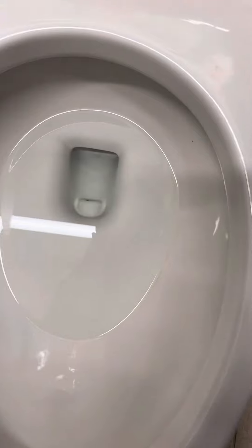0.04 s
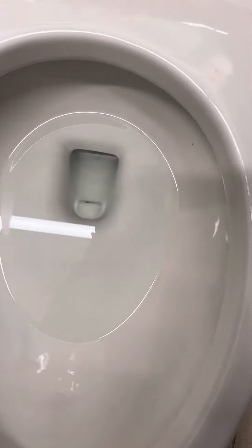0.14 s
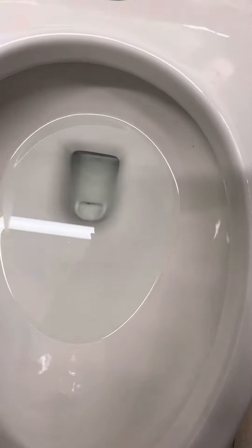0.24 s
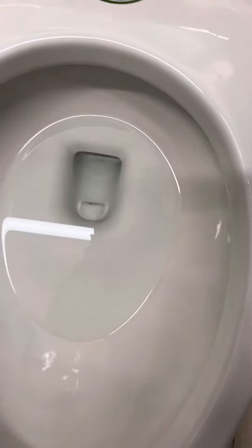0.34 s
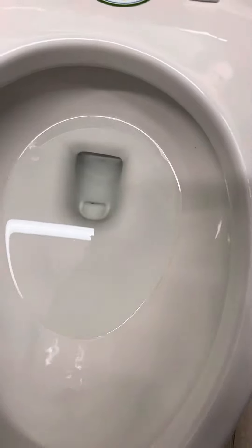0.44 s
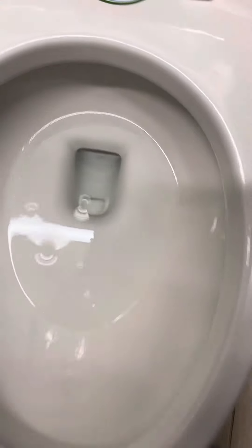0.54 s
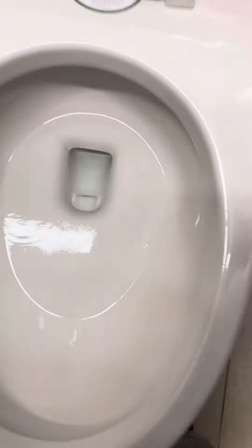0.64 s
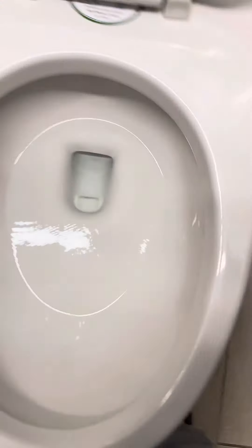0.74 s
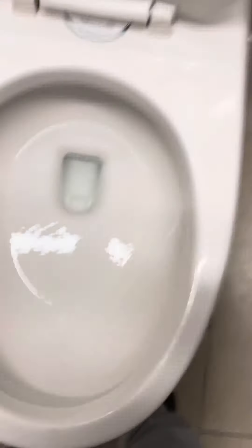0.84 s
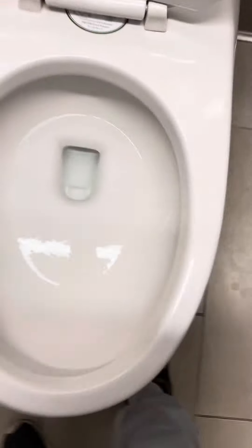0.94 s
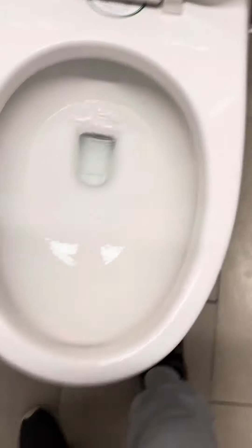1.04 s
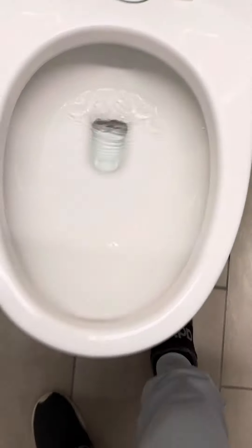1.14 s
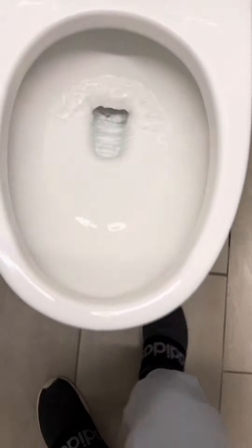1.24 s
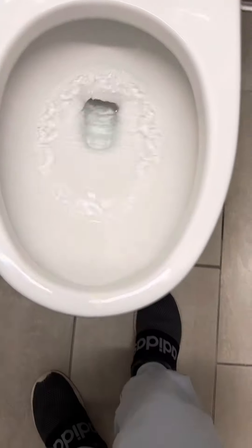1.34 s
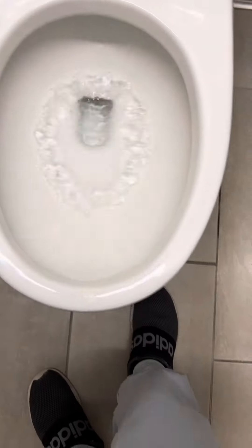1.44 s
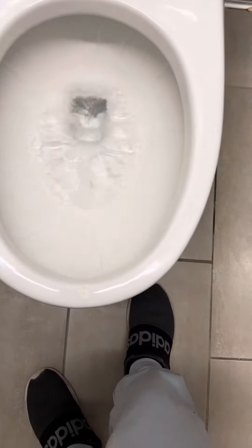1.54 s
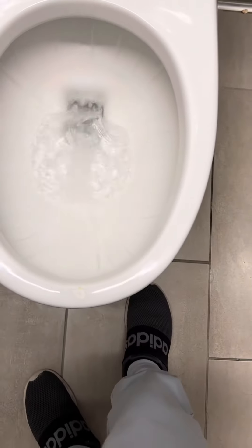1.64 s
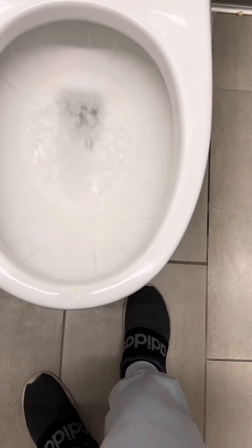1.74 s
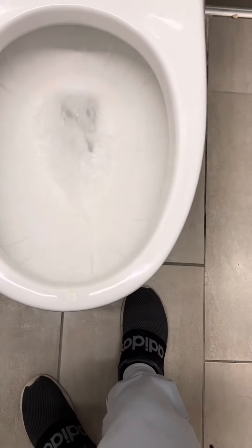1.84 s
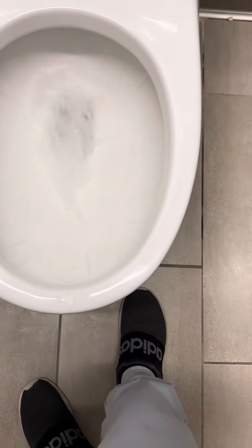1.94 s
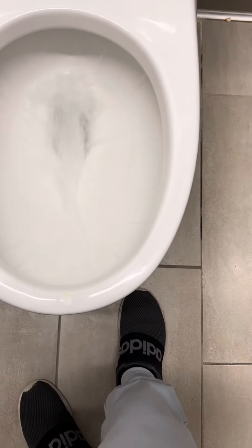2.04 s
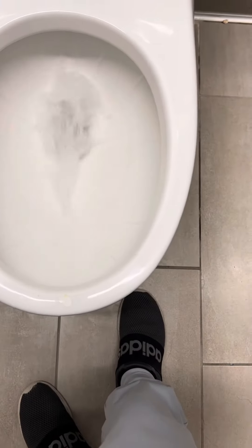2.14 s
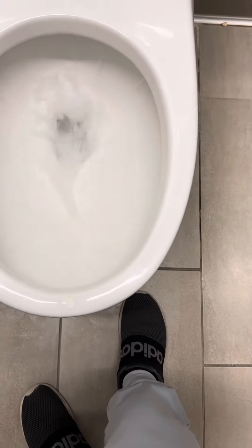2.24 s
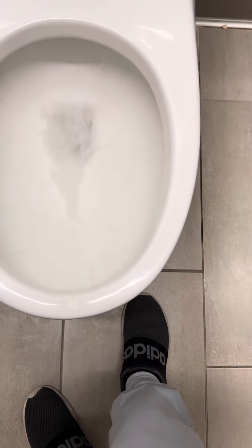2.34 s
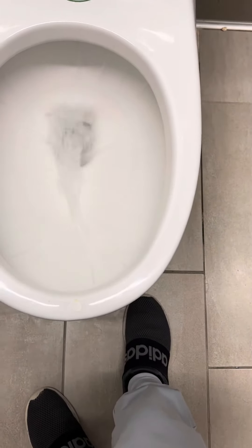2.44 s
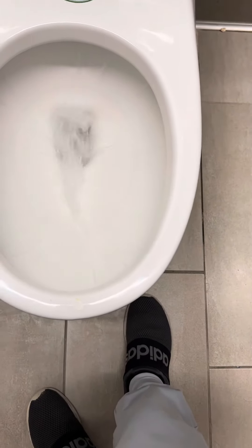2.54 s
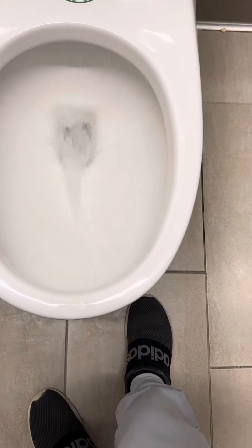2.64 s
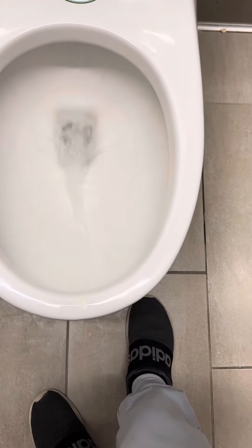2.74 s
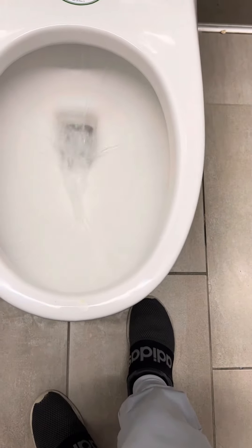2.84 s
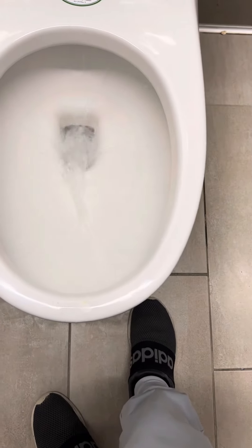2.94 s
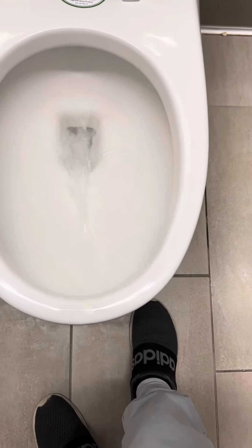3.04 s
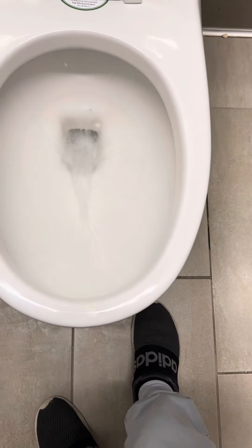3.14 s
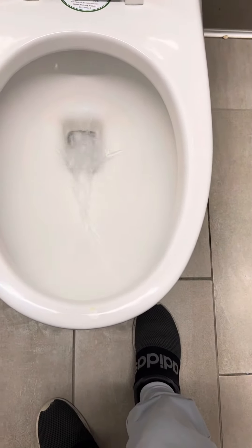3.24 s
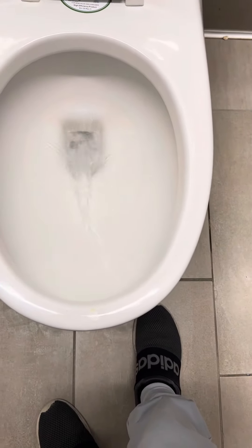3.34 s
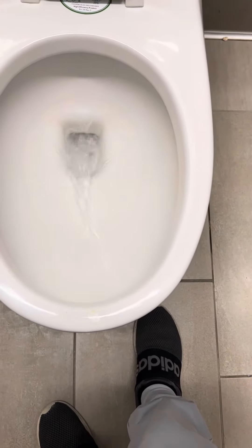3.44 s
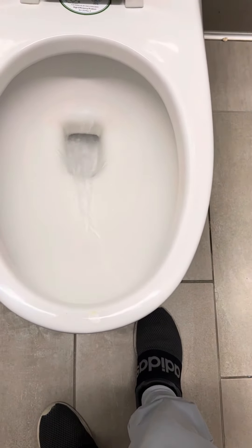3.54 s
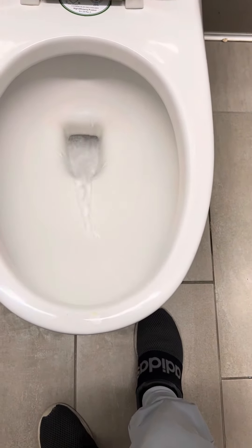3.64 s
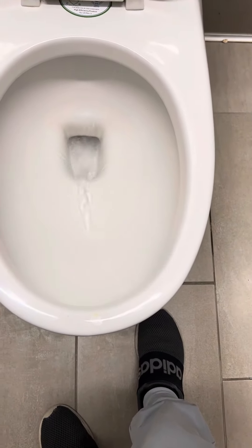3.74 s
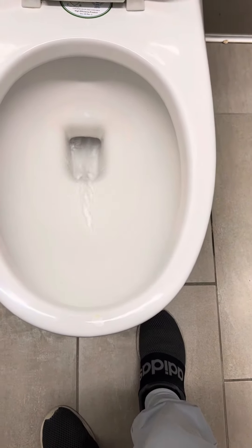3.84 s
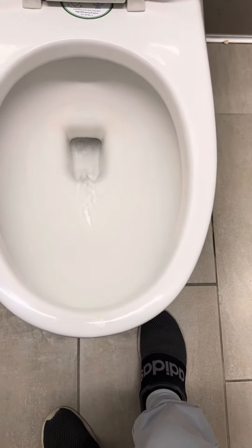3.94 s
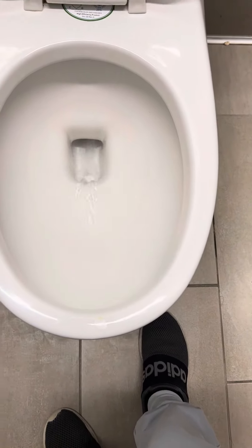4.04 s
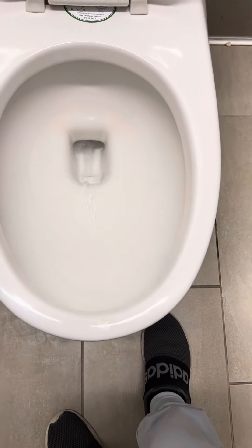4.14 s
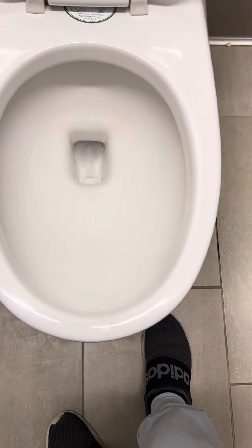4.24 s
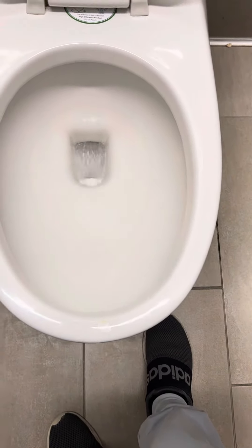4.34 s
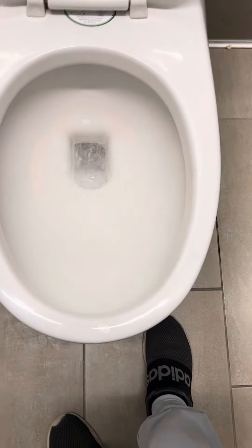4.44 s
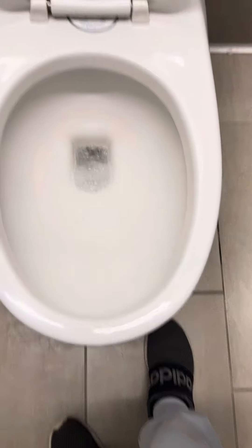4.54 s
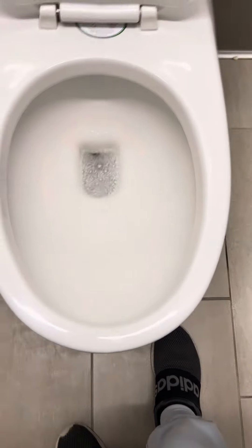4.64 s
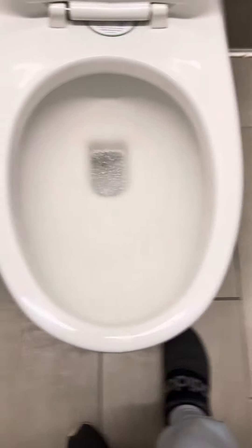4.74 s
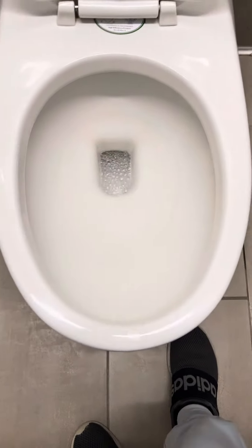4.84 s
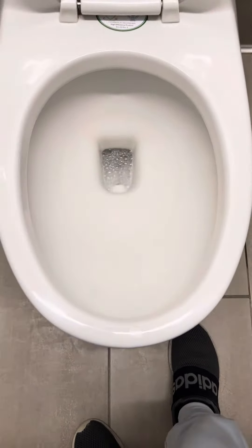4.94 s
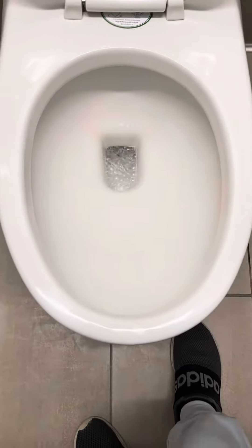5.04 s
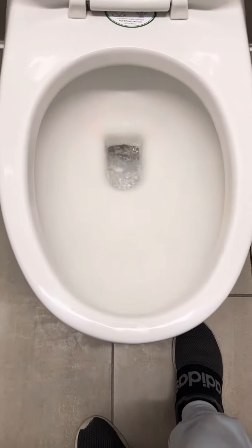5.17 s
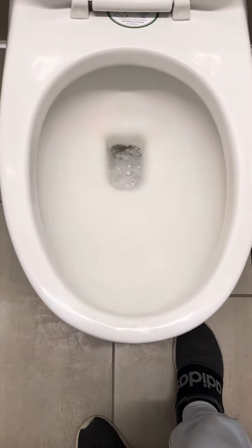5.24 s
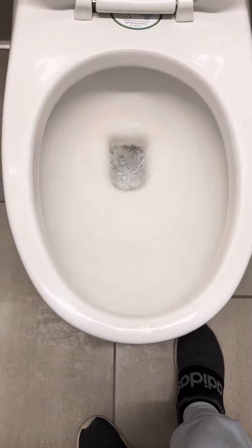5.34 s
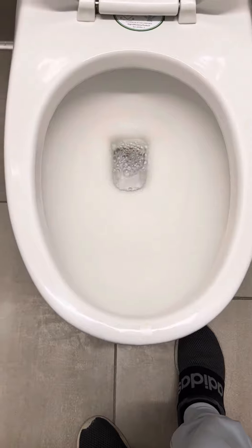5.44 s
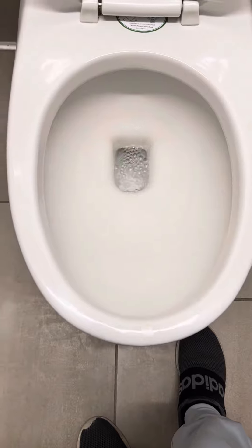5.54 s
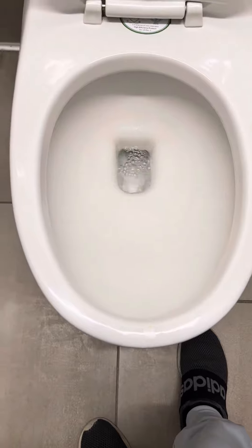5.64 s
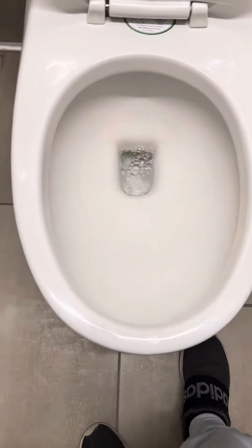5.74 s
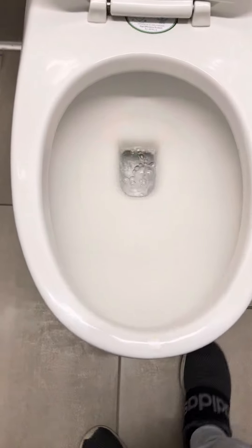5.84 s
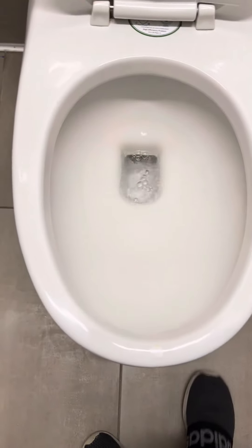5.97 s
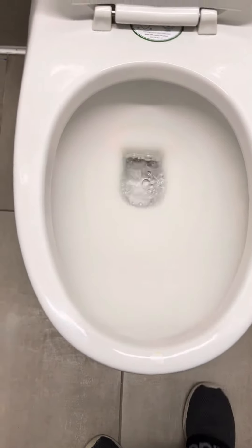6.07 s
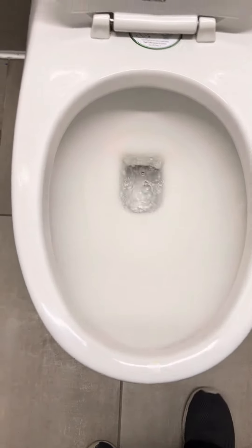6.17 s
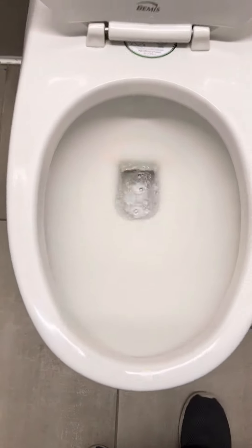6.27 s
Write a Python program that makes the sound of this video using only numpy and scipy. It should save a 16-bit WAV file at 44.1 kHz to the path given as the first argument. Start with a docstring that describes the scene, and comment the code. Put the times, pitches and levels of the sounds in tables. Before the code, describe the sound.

A pressure toilet flushes in a small tiled bathroom, heard from above in stereo. The valve hisses and knocks open, and the pipes thud and rumble. Water suddenly sprays onto the porcelain, then the drain gulps and gurgles loudly while sucked air whistles and sizzles. The flow fades, the valve closes with a faint hiss and hum, and a few drips and ticks remain.

```python
"""A pressure toilet flushes in a small tiled bathroom, heard from above in stereo.
The valve hisses and knocks open, and water hammer thuds along the rumbling pipes. The jets spurt and
spray onto the porcelain; then the trap gulps ringing air bubbles while air drawn through the jet
whistles and sizzles. The flow dies away, the valve seats with a hiss and a low hum, and a few late
drops and ticks remain."""
import sys
import numpy as np
from scipy import signal
from scipy.fft import rfft, irfft, next_fast_len
from scipy.io import wavfile
from scipy.ndimage import uniform_filter1d, minimum_filter1d

SR = 44100
rng = np.random.default_rng(int(sys.argv[2]) if len(sys.argv) > 2 else 0)


def waveform_to_disk(signal):
    """Save audio, clipped to [-1, 1], as 16-bit WAV at the path in sys.argv[1]."""
    frames = np.transpose(np.atleast_2d(signal))
    scaled = np.clip(frames, -1, 1) * 32767
    samples = np.round(scaled).astype(np.int16)
    wavfile.write(sys.argv[1], SR, samples)


N = 278196


def gain_of(db):
    """Amplitude ratio of a level in decibels."""
    return 10 ** (np.asarray(db) / 20)


def unit_rms(x):
    """Normalisation to unit mean power."""
    return x / np.sqrt(np.mean(x ** 2) + 1e-20)


def spectrum(points):
    """A function of frequency, interpolated between points on a logarithmic axis."""
    f, value = np.transpose(points)
    return lambda hz: np.interp(np.log(hz + 1), np.log(f + 1), value)


def resonances(rows):
    """A spectrum in dB whose resonance peaks add in power."""
    return lambda hz: 10 * np.log10(sum(
        gain_of(db) ** 2 / (1 + (2 * (hz - f) / width) ** 2) ** 1.25 for f, width, db in rows))


def envelopes(rows):
    """Piecewise linear envelopes, one for each column after the time."""
    times, *columns = np.transpose(rows)
    return [np.interp(np.arange(N) / SR, times, column) for column in columns]


def swells(rows):
    """Exponential growth to each peak and exponential decay after it."""
    t = np.arange(N) / SR
    return sum(gain_of(db - np.maximum(rise * (s - t), fall * (t - s))) for s, db, rise, fall in rows)


def add(mix, start_s, sound):
    """Superposition of a sound on the mix."""
    part = mix[round(start_s * SR):][:len(sound)]
    part += sound[:len(part)]


def noises(spectra, patchy_db, flicker_db, size):
    """Modulated noise: one uncorrelated pair, with drifting patches and flicker, in each spectrum."""
    frames, bins = 4 * N // size + 5, size // 2 + 1
    a, b, c, d, patches = rng.standard_normal((frames, bins, 5)).T
    patches = unit_rms(uniform_filter1d(uniform_filter1d(patches, size=7, axis=0), size=9, axis=1))
    flicker = unit_rms(uniform_filter1d(rng.exponential(1, frames) - 1, size=3))
    z = np.array([a + 1j * b, c + 1j * d]) * gain_of(patchy_db * patches + flicker_db * flicker)
    hz = np.fft.rfftfreq(size, 1 / SR)
    shaped = (z * gain_of(shape_db(hz))[:, None] for shape_db in spectra)
    return [unit_rms(signal.istft(x, nperseg=size, noverlap=3 * size // 4)[1][:, :N]) for x in shaped]


def bubble(hz, cycles, rise, swell_cycles=0.31):
    """A damped oscillator, such as an air pocket; its pitch glides by the share `rise` in `cycles`."""
    u = np.arange(0, 2 * cycles, hz / SR)
    envelope = np.minimum(u / swell_cycles, 1) * np.exp(-0.87 * (u / cycles) ** 2)
    return envelope * np.sin(2 * np.pi * u * (1 + rise * u / cycles / 2))


def swarm(lo_hz, hi_hz, per_s, cycles, rise, spread_db, pitches):
    """A Poisson process of ringing bubbles: the louder, the rarer."""
    out = np.zeros((2, N))
    for hz in np.geomspace(lo_hz, hi_hz, pitches):
        luck = rng.random((2, N), dtype=np.float32) / (per_s / pitches / SR)
        born, train = luck < 1, np.zeros((2, N))
        train[born] = gain_of(-spread_db * np.log(np.maximum(luck[born], np.exp(-4))))
        ring = bubble(hz, cycles, rise * rng.uniform(-0.77, 1))
        out += signal.oaconvolve(train, ring[None], axes=1)[:, :N]
    return out


def room_noise():
    """The ambient noise floor, with most of its power at low frequencies."""
    # Each row: frequency in Hz, spectral density in dB.
    density = [(30, -10.5), (48, 5.5), (100, -9), (200, 5.5), (350, -12), (600, -18), (1500, -30),
               (4000, -39.5), (9000, -49), (16000, -64)]
    return gain_of(-60) * noises([spectrum(density)], patchy_db=1.8, flicker_db=1.2, size=1024)[0]


def tile_reverb(x):
    """Reverberation: reflections off the tiles form two diffuse tails, each band with its own decay."""
    # Each row: frequency in Hz, time to fall 60 dB in seconds.
    t60 = spectrum([(100, 0.27), (1000, 0.3), (5000, 0.3), (15000, 0.18)])
    hz, t, z = signal.stft(rng.standard_normal((2, SR // 2)), SR, nperseg=256)
    tail = signal.istft(z * gain_of(-60 * t / t60(hz)[:, None]), SR, nperseg=256)[1]
    return signal.fftconvolve(x[None], tail / np.linalg.norm(tail[0]), axes=1)[:, :N]


def in_bowl(x):
    """Cavity resonance: the bowl favours two bands and, being minimum phase, rings only after a blow."""
    # Each row: frequency in Hz, gain in dB.
    response = [(150, -42.5), (300, -23.5), (500, -14), (620, -2), (800, 0), (900, 0), (990, -5),
                (1150, -1), (1350, -1), (1600, 1), (1780, -8), (2050, -2), (2400, -10.5), (5000, -35),
                (9000, -71.5)]
    hz = abs(np.fft.fftfreq(4096, 1 / SR))
    log_gain = np.log(gain_of(spectrum(response)(hz)))
    taps = np.fft.ifft(np.exp(np.conj(signal.hilbert(log_gain)))).real[:2048]
    return signal.oaconvolve(np.atleast_2d(x), taps[None], axes=1)[:, :N]


def plumbing():
    """Forced vibration: shaken as the valve opens and shuts, the pipes rumble and the bowl drones."""
    # Each row: frequency in Hz, spectral density in dB.
    rumble = [(25, -25.5), (40, -14), (52, 9), (68, 26.5), (80, -4.5), (110, -32.5)]
    # Modes of the supply pipe and the bowl. Each row: frequency in Hz, width in Hz, level in dB.
    pipe_modes = [(90.4, 5.1, 5), (125, 30, -18.5), (215.5, 130, -20.5)]
    bowl_modes = [(240, 14, -4), (306, 8, 6), (356, 12, 2), (416, 9, 2), (474, 110, -11)]
    # Each row: time in seconds, then the levels of rumble, pipe ring and bowl drone in dB.
    levels = [(0, -78.5, -51.5, -64), (.28, -58.5, -49, -53), (.33, -43, -37.5, -36.5),
              (.42, -40, -37, -38.5), (.5, -35, -30, -35.5), (.58, -41, -32, -38.5),
              (.65, -32.5, -30, -38.5), (.76, -36, -33, -42), (.95, -36.5, -41.5, -46.5),
              (1.2, -40.5, -50, -39), (1.5, -43.5, -57.5, -41), (1.6, -58.5, -44, -31.5),
              (1.87, -39, -42, -25), (2.0, -45, -45, -28.5), (2.15, -39.5, -45, -26),
              (2.4, -44, -36.5, -34), (2.9, -46, -47.5, -36.5), (3.1, -49.5, -54.5, -38),
              (3.3, -45.5, -46.5, -43), (3.6, -54, -60, -45.5), (3.92, -66, -64, -52.5),
              (3.95, -70, -42.5, -46), (4.05, -65.5, -51, -47), (4.14, -63, -46.5, -51.5),
              (4.25, -66, -50, -59), (4.52, -76, -64, -69.5), (4.72, -71, -67, -63), (4.9, -67, -61.5, -67),
              (5.05, -64, -65, -57.5), (5.3, -62, -57.5, -64.5), (5.9, -58, -61, -65.5),
              (6.3, -59.5, -64, -63)]
    spectra = [spectrum(rumble), resonances(pipe_modes), resonances(bowl_modes)]
    layers = noises(spectra, patchy_db=2.0, flicker_db=1.1, size=4096)
    return sum(gain_of(db) * layer for db, layer in zip(envelopes(levels), layers))


def valve_flow():
    """Flow noise in resonant bands: the valve hisses as it opens, and hisses and hums as it seats."""
    # Each row: frequency in Hz, width in Hz, level in dB.
    hiss_bands = [(4880, 480, 4.5), (3640, 400, -9)]
    hum_bands = [(445, 70, 0)]
    # Each row: time of the peak in seconds, level in dB, rise and fall in dB per second.
    hiss_swells = [(.27, -50, 92.5, 26.5), (4.605, -58, 500, 116), (4.655, -54, 200, 145)]
    hum_swells = [(4.655, -58.5, 200, 64), (4.73, -59.5, 99, 110)]
    spectra = [resonances(hiss_bands), resonances(hum_bands)]
    hiss, hum = noises(spectra, patchy_db=2.0, flicker_db=0.85, size=1024)
    return swells(hiss_swells) * hiss + swells(hum_swells) * hum


def ticks():
    """Impact transients: the lever and drops give bright, quickly damped bursts of band noise."""
    # Each row: start in seconds, level in dB, centre in Hz, width as a share of the centre.
    impacts = [(0.0904, -54, 7050, 0.3), (0.283, -31.5, 2570, 0.69), (0.3324, -38, 12800, 0.14),
               (0.334, -24, 2600, 0.46), (0.342, -37, 2400, 0.21), (0.401, -37, 4910, 0.28),
               (0.497, -26, 2960, 0.55), (4.03, -38, 6800, 0.15), (4.092, -40, 7500, 0.3),
               (4.1786, -37.5, 13300, 0.2), (4.193, -46, 14000, 0.1), (4.297, -46, 12000, 0.11),
               (4.605, -53, 6420, 0.21), (4.653, -44, 5030, 0.2), (4.6903, -52.5, 5180, 0.36),
               (4.922, -47.5, 7600, 0.062), (4.957, -51, 12000, 0.13), (4.964, -50, 13000, 0.12),
               (5.003, -53, 12300, 0.12), (4.9573, -53, 3560, 0.81), (4.9915, -38.5, 2210, 0.57),
               (5.1537, -59, 13540, 0.12), (5.2994, -54, 5520, 0.6), (5.463, -60, 4000, 0.15),
               (5.515, -59, 4400, 0.12), (5.5313, -53, 9000, 0.35), (5.546, -59, 4000, 0.15),
               (5.67, -53, 3660, 0.6), (5.7409, -49, 2600, 0.75), (5.8546, -56.5, 4104, 0.43),
               (5.9213, -51.5, 3870, 0.49), (6.0824, -53, 6900, 0.22), (6.1681, -67.5, 6620, 0.37)]
    out, t = np.zeros(N), np.arange(8000) / SR
    hz = np.fft.rfftfreq(len(t), 1 / SR) + 1
    attack_s, t60_s = 0.0004, 0.02
    envelope = np.minimum(t / attack_s, 1) * gain_of(-60 * t / t60_s)
    for start, db, centre, width in impacts:
        band = np.exp(-(np.log(hz / centre) / width) ** 2 / 2)
        burst = unit_rms(irfft(rfft(rng.standard_normal(len(t))) * band))
        add(out, start, gain_of(db) * envelope * burst)
    return out


def valve_knocks():
    """Modal ringing: each knock of the valve and lever excites the same damped modes."""
    # Each row: frequency in Hz, level in dB, time to fall 60 dB in seconds.
    valve_modes = [(352, 0, .055), (255, -19, .08), (1020, -32, .1)]
    # Each row: start in seconds, level in dB.
    knocks = [(.2888, -10.5), (.303, -24), (.3115, -23), (.32, -25), (.495, -27), (.632, -25), (.808, -30)]
    out, t = np.zeros(N), np.arange(8000) / SR
    ring = sum(gain_of(db - 60 * t / t60) * np.sin(2 * np.pi * hz * t) for hz, db, t60 in valve_modes)
    attack = np.minimum(t / 0.004, 1)
    for start, db in knocks:
        add(out, start, gain_of(db) * attack * ring)
    return out


def water_hammer():
    """Pressure surges thud along the pipe as low, heavily damped oscillations; the rows near 190-200 Hz are low
    glugs of large air pockets."""
    # Each row: start in seconds, level in dB, pitch in Hz.
    thuds = [(.332, -19, 83.4), (0.366, -21, 85.8), (.402, -23.5, 86.3), (0.453, -23.5, 75.6),
             (0.458, -21, 187.6), (0.498, -16, 85.3), (0.537, -14.5, 202.7), (.545, -29, 80),
             (0.584, -18.5, 85.5), (.622, -13.5, 76.7), (0.65, -25, 90.5), (0.679, -19, 90),
             (0.718, -21, 78.2), (0.741, -23, 77.4), (.773, -25, 82), (0.812, -23, 83.4),
             (0.835, -24, 82.5), (0.868, -26.5, 79.5), (0.923, -30, 84.9), (3.941, -42, 89.4),
             (4.12, -38, 90.8)]
    out = np.zeros(N)
    for start, db, hz in thuds:
        add(out, start, gain_of(db) * bubble(hz, cycles=1.4, rise=0, swell_cycles=0.71))
    return out


def air_whistles():
    """Aerodynamic tones: air drawn through the jet squeals in short glides that waver and flutter."""
    # Each row: start in seconds, level in dB, pitch in Hz, length in cycles, pitch rise as a share.
    glides = [(1.975, -30, 4280, 260, 0.11), (1.984, -19.5, 5200, 190, 0.031),
              (2.035, -22.5, 4890, 220, -0.012), (2.091, -14.5, 4690, 49, 0.064),
              (2.097, -19, 5520, 170, 0.12), (2.098, -17, 5240, 670, 0.05), (2.145, -21.5, 5160, 210, 0.11),
              (2.167, -16, 4730, 88, 0.051), (2.191, -20, 3980, 120, 0.037),
              (2.197, -30, 6460, 150, -0.046), (2.204, -19.5, 5100, 170, -0.062),
              (2.235, -18.5, 4750, 71, 0.041), (2.331, -29, 7440, 240, -0.072),
              (2.37, -27.5, 6700, 140, -0.059), (2.379, -20, 5390.0, 140, -0.095),
              (2.406, -25.5, 3930, 55, -0.0022), (2.423, -20.5, 3970, 110, 0.035),
              (2.436, -22.5, 5200, 200, -0.053), (2.441, -35, 7060, 96, 0.02),
              (2.451, -25.5, 4760, 140, 0.011), (2.532, -23, 4320, 230, -0.035),
              (2.537, -24.5, 4670, 86, 0.014), (2.583, -19, 4740, 71, 0.11), (2.599, -34, 7330, 330, 0.02),
              (2.67, -23.5, 5330, 294, -0.18), (2.702, -22, 4460, 234, -0.17),
              (2.733, -31.5, 7530, 170, -0.045), (2.743, -26.5, 3646, 142, -0.11),
              (2.753, -18, 5220, 61, -0.05), (2.831, -26, 3720, 175, 0.13), (2.869, -16, 5020, 140, -0.071),
              (2.902, -20, 3410, 140, -0.0041), (2.94, -28.5, 3950, 180, 0.0),
              (2.977, -27.5, 3500, 73, 0.03)]
    out = np.zeros(N)
    for start, db, hz, cycles, rise in glides:
        progress = np.arange(0, 1, hz / cycles / SR)
        drift = unit_rms(uniform_filter1d(rng.standard_normal((2, 6000)), size=150, axis=1))
        waver, flutter = drift[:, :len(progress)]
        turns = np.cumsum(hz * (1 + rise * progress + 0.009 * waver)) / SR
        envelope = gain_of(db + 5.5 * flutter) * signal.windows.tukey(len(progress), 0.6)
        add(out, start, envelope * np.sin(2 * np.pi * turns))
    return out


def air_sizzle():
    """Small bubbles resonate high: air sizzles in the jet while the trap sucks."""
    # Each row: time in seconds, level in dB.
    levels = [(1.7, -87), (1.96, -30.5), (2.2, -30.5), (2.5, -29.5), (2.75, -29.5), (2.95, -33), (3.1, -43),
              (3.6, -90)]
    sizzle = swarm(3350, 5300, per_s=450, cycles=70, rise=-0.1, spread_db=4, pitches=12)
    return gain_of(envelopes(levels)[0]) * unit_rms(sizzle)


def spurts():
    """Amplitude modulation: as the jets start and stop, each spurt lifts the flow at once, then sags."""
    # Each row: start in seconds, lift in dB.
    lifts = [(.336, 5), (.498, 5), (.955, 5), (.97, 8), (1.011, 13), (1.031, 8), (1.053, 12), (1.088, 12),
             (1.105, 6), (1.129, 11), (1.148, 8), (1.174, 7), (1.206, 6), (1.235, 5), (4.049, 6), (4.09, 5),
             (4.122, 9), (4.296, 4)]
    t, sag_s = np.arange(N) / SR, 0.014
    return gain_of(sum(db * (t > start) * np.exp(-abs(t - start) / sag_s) for start, db in lifts))


def water_jets():
    """Broadband flow and impact noise: the jets patter and splash on porcelain and throw spray and mist."""
    # Each row: frequency in Hz, spectral density in dB.
    patter_band = [(1200, -21), (1700, -3), (2050, 9), (2400, 9), (2900, 3.5), (3800, -52)]
    splash_band = [(2200, -30), (3000, -2), (3600, 0), (4300, -1), (5000, -1), (6000, -4), (7500, -30)]
    spray_band = [(4000, -8.5), (5800, 2.5), (7500, 9), (9000, 4.5), (10500, -2.5), (13000, -15.5)]
    mist_band = [(8000, -30), (10500, -2.5), (12000, -2.5), (13500, 2.5), (15000, 7.5), (16000, -12.5)]
    # Each row: time in seconds, jet force in dB, then mist and patter relative to it in dB.
    flow = [(0, -91.5, -10, 14), (.26, -73.5, -9, 6.5), (.34, -61.5, 7.5, -3.5), (.5, -54.5, 0, 10),
            (.93, -58.5, -1.5, 4), (1.15, -48, 8, 5), (1.22, -37.5, -0.5, -3), (1.28, -23, -6, -5),
            (1.34, -27, 0, -4), (1.42, -27, -2.5, -3), (1.68, -34, 3, -2.5), (1.76, -29.5, -1.5, -5),
            (1.84, -33.5, 4, -1), (1.89, -38.5, 1, 3.5), (1.98, -27, -3.5, -13), (2.03, -35, 5.5, -1.5),
            (2.15, -29, -4, -4.5), (2.97, -34, -4, -1.5), (3.02, -38.5, -3.5, 1.5), (3.75, -47, -4.5, 0),
            (3.95, -56.5, -6.5, 1.5), (4.25, -62.5, -9.5, 8), (4.45, -80, 4, 11.5), (4.57, -84, -10, 8),
            (4.63, -69.5, -28, 3), (4.74, -80, -25, 7), (4.88, -82.5, -40, 6), (4.96, -67.5, 6, 15),
            (5.06, -80.5, -9, 20), (5.4, -84.5, -20.5, 8), (6.3, -91.5, -14.5, 7)]
    # The splash sinks while the trap sucks. Each row: time in seconds, level over the force in dB.
    splash_levels = [(0, 10), (.3, 8.5), (.9, 9.5), (1.25, -1.5), (1.6, 4), (1.9, -3.5), (2.05, -18),
                     (2.9, -5.5), (3.1, 4.5), (4.2, 5.5), (4.5, 10.5), (6.3, 12.5)]
    spectra = [spectrum(band) for band in (patter_band, splash_band, spray_band, mist_band)]
    patter, splash, spray, mist = noises(spectra, patchy_db=2.43, flicker_db=0.32, size=256)
    plinks = swarm(1700, 2900, per_s=900, cycles=35, rise=0.1, spread_db=6, pitches=6)
    patter = unit_rms(patter + 0.55 * unit_rms(plinks))
    force_db, mist_db, patter_db = envelopes(flow)
    airborne = gain_of(1.5) * spray + gain_of(5 + mist_db) * mist
    on_porcelain = gain_of(patter_db) * patter + gain_of(envelopes(splash_levels)[0]) * splash
    return gain_of(force_db) * (airborne + on_porcelain)


def trap_gurgle():
    """Bubble pitch falls with size: large ones gulp and smaller ones gurgle, filtered by the bowl."""
    # Each row: time in seconds, level in dB, small bubbles relative to large ones in dB.
    levels = [(0, -82, 3), (.27, -61.5, -7.5), (.3, -44, -13), (.5, -43, 0.5), (.93, -52, -3.5),
              (1.15, -49.5, 0), (1.26, -35, 2.5), (1.4, -45.5, 8.5), (1.55, -37.5, -3), (1.59, -35, 1),
              (1.76, -25, -8), (1.84, -20, 0.5), (1.9, -19, -3.5), (1.96, -20, -5.5), (2.08, -18.5, -2),
              (2.135, -22, -7), (2.17, -17, -8), (2.21, -26.5, -11), (2.25, -26, 0.5), (2.6, -26.5, -1.5),
              (2.8, -32, 3), (3.4, -41.5, 6), (3.85, -48.5, 1.5), (3.92, -48.5, 0), (4.0, -56, 4.5),
              (4.15, -48.5, -3.5), (4.32, -57, 6.5), (4.45, -71.5, 7.5), (4.9, -73.5, 0),
              (4.97, -57.5, -5.5), (5.14, -69.5, 12), (5.22, -70.5, 7), (5.4, -78, 5.5), (6.3, -81, -6.5)]
    level_db, small_db = envelopes(levels)
    large = swarm(479, 910, per_s=2200, cycles=4.6, rise=0.25, spread_db=5.5, pitches=9)
    small = swarm(1000, 1750, per_s=3800, cycles=12, rise=0.25, spread_db=4.5, pitches=10)
    return gain_of(level_db) * (unit_rms(in_bowl(large)) + gain_of(small_db) * unit_rms(in_bowl(small)))


def single_bubbles():
    """Bubble resonance: each large bubble or drop opens with a pop that rings the bowl, then sings."""
    # Each row: start in seconds, level in dB, pitch in Hz, length in cycles, relative pop level in dB.
    pockets = [(0.115, -45, 1820, 9.7, 5), (0.338, -29, 1825, 5.5, 5), (.343, -30, 1023, 16, 0),
               (.42, -39, 1040, 17, 0), (.456, -18, 275, 1.3, -20), (.47, -25.5, 301, 5.7, -20),
               (.541, -18.5, 260.7, 2.6, -20), (0.711, -39, 1017, 39, 2), (.755, -40, 1037, 29, -10.5),
               (1.01, -29, 1361, 9.3, -3), (1.054, -27.5, 1360, 11, 1.5), (1.101, -31, 1369, 9.6, -3.5),
               (1.128, -29, 1330, 10, -2.5), (1.146, -26.5, 1590, 14, 2.5), (1.205, -27, 1789, 13, -1),
               (1.237, -26.5, 1530, 10, -2), (1.29, -19, 1670, 21, -1), (1.329, -13, 1959, 9, 2),
               (1.333, -20.5, 1683, 14, 5.5), (1.358, -20.5, 2187, 11, 4), (1.424, -18, 3214, 32, -1),
               (1.462, -23, 1578, 11, 0), (1.466, -21, 3035, 15, 3), (1.573, -2, 706, 2.4, 1),
               (1.575, -16, 329.5, 12, 2.5), (1.618, -21.5, 1328, 18, -2), (1.643, -15, 1507, 12, 5.5),
               (1.668, -22, 1328, 14, 4.5), (1.792, -8.5, 626, 14, -2), (1.808, -6, 705, 8.4, 11),
               (1.806, -13, 289.6, 9.2, 2.5), (1.838, -5.5, 1188, 10, 9), (1.854, -16.5, 425, 17, 1.5),
               (1.866, 1.5, 649, 5, -3.5), (1.866, -8, 464, 5.7, 4.5), (1.883, -3, 808, 6.1, 3.5),
               (1.891, -5.5, 554, 3.1, -0.5), (1.891, -12, 306, 5.6, -3.5), (1.912, -12.5, 324, 8, -2),
               (1.927, -10, 739, 5.2, 8), (1.939, -4, 627, 5.6, 13.5), (1.94, -14.5, 433, 6.8, 2),
               (1.964, -18, 723, 4.4, 4.5), (2.004, -16.5, 983, 11, 0.5), (2.022, -10, 774, 7.2, 7),
               (2.039, -9.5, 851, 8, 1), (2.071, -11.5, 865, 6.3, 2), (2.087, -15.5, 789, 8, 1),
               (2.112, -1.5, 576, 3.9, -0.5), (2.112, -11, 472, 4.4, -2), (2.115, -22, 313.3, 8.8, 4),
               (2.154, -4.5, 756, 5.4, 5), (2.183, -3.5, 685, 5.6, 19), (2.209, -12, 718, 3.3, 5),
               (2.292, -13, 626, 4.3, 2), (2.33, -12, 1206, 3.2, -0.5), (2.352, -16.5, 705, 7, 3),
               (2.513, -13.5, 737, 7.4, 13.5), (2.549, -16, 863, 12, 8), (2.703, -8, 1191, 2.1, 21.5),
               (2.704, -15.5, 770, 2.8, 3.5), (2.728, -11.5, 865, 6.2, 16), (2.729, -11.5, 1352, 2.2, 6),
               (2.78, -20.5, 1279, 7.4, 7.5), (2.848, -24.5, 902, 8.1, 5), (3.11, -29, 307, 36, -20),
               (3.2, -33.5, 299, 31, -20), (3.93, -32.5, 299, 11, -20), (4.02, -42, 303, 12, -20),
               (4.095, -35, 297, 12, -20), (4.577, -51, 1900, 8.1, 5), (4.921, -35, 2154, 5, -4),
               (4.923, -29.5, 1415, 8.4, -9.5), (4.934, -48, 1250, 6.9, 0), (4.941, -37.5, 1105, 10.5, 18),
               (4.962, -52, 900, 8.6, -3), (4.976, -45, 710, 6, -3), (5.014, -51, 410, 7.2, -3),
               (4.991, -35, 1358, 6.2, 3), (5.017, -45.5, 1376, 8.2, 4), (5.04, -41, 1376, 6.3, 7),
               (5.077, -34, 680, 7.4, 10), (5.077, -34, 1448, 7.07, -1.5), (5.078, -44, 466, 4, -1.5),
               (5.74, -55, 1280, 6.1, -0.5), (5.87, -55, 1304, 5.2, 3.5), (5.937, -56, 1167, 18, 0)]
    tones, pops = np.zeros(N), np.zeros(N)
    for start, db, hz, cycles, pop_db in pockets:
        rise = 0.05 * min(3.3 / cycles, 1)  # long bubbles climb less
        add(tones, start, gain_of(db) * bubble(hz, cycles, rise, swell_cycles=0.22 * cycles))
        add(pops, start, gain_of([db + pop_db]))
    low_cut = signal.butter(2, 240, "high", fs=SR, output="sos")  # the bubble tones carry no deep bass
    return signal.sosfilt(low_cut, tones) + in_bowl(pops)[0]


def scene():
    """Superposition of the sources: row 0 feeds both channels, row 1 only the right one."""
    blows = ticks() + valve_knocks() + water_hammer() + single_bubbles()
    whistles = air_whistles()
    direct = (blows + whistles) * [[1], [0]]
    floor = room_noise()
    reverb = gain_of(-7) * tile_reverb(blows + gain_of(-4) * whistles)
    pipes = plumbing()
    water = spurts() * (trap_gurgle() + water_jets())
    return floor + reverb + pipes + valve_flow() + air_sizzle() + water + direct


def gain_control(x):
    """Compression: the gain ducks after loud gulps by a share of the excess level, then recovers."""
    threshold_db, share, release_db_per_s = -17.5, 0.1, 97.5
    power_db = 10 * np.log10(abs(uniform_filter1d(x[0] ** 2, size=400)) + 1e-12)
    fall_db = np.arange(N) * release_db_per_s / SR
    held_db = np.maximum.accumulate(power_db + fall_db) - fall_db
    excess_db = np.maximum(held_db - threshold_db, 0)
    return x / gain_of(share * uniform_filter1d(excess_db, size=200))


def stereo_image(x):
    """Stereo image: left-right phase, coherence and balance vary with frequency."""
    # The treble alternates between in phase and opposed.
    # Each row: frequency in Hz, phase lead of left over right in radians.
    phase_leads = [(0, 0), (500, -.45), (950, -1.0), (1600, 0), (2600, 2.4), (3900, 1), (4900, 2),
                   (5500, np.pi), (7000, 2 * np.pi), (8100, 2 * np.pi), (9700, 3 * np.pi),
                   (10800, 3 * np.pi), (11900, 4 * np.pi), (13000, 4 * np.pi), (14700, 5 * np.pi),
                   (17000, 5 * np.pi)]
    # Each row: frequency in Hz, coherence from 0 to 1.
    coherences = [(130, 1), (250, 0.96), (500, 0.77), (900, 0.78), (1500, 1), (2500, 0.65), (4400, 0.13),
                  (5500, 1), (6300, 1)]
    # Each row: frequency in Hz, left minus right level in dB.
    balances = [(60, 0), (200, .7), (600, 1.5), (1200, -1), (2700, -1.8), (4500, -1.2), (6500, 0),
                (15000, 0)]
    size = next_fast_len(N + 4096)
    hz = np.fft.rfftfreq(size, 1 / SR)
    common, right_only = rfft(x, size)
    lead = np.interp(hz, *np.transpose(phase_leads))
    treble_coherence = 1 - 0.3 * np.sin(lead) ** 2  # full where left and right are in step or opposed
    coherence = np.clip(np.where(hz < 6300, spectrum(coherences)(hz), treble_coherence), 0, 1)
    right = (coherence * common + np.sqrt(1 - coherence ** 2) * right_only) * np.exp(-1j * lead)
    tilt = gain_of(spectrum(balances)(hz) / 2)
    return irfft(np.array([common * tilt, right / tilt]), size)[:, :N]


def record(dry):
    """The signal chain: gain control, the stereo image, a peak limiter and the band limits."""
    pair = stereo_image(gain_control(dry))
    ceiling, top_hz = 0.88, 15900
    safe_gain = np.minimum(ceiling / (abs(pair).max(0) + 1e-9), 1)
    pair = pair * uniform_filter1d(minimum_filter1d(safe_gain, size=257), size=129)
    low_cut = signal.butter(2, 36, "high", fs=SR, output="sos")  # small capsules drop the deepest bass
    high_cut = signal.firwin(511, top_hz, window=("kaiser", 9), fs=SR)
    return signal.oaconvolve(signal.sosfilt(low_cut, pair), high_cut[None], "same")


dry = scene()
out = record(dry)
waveform_to_disk(out)
```